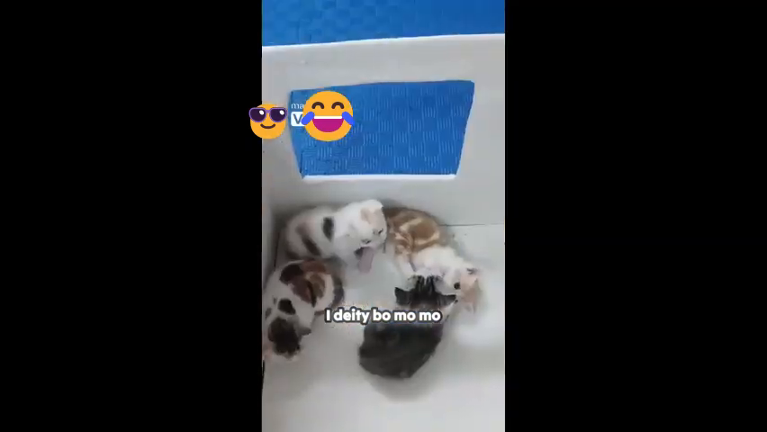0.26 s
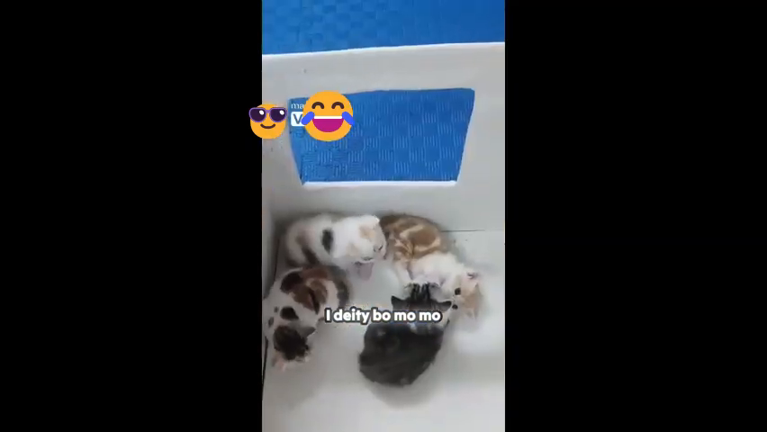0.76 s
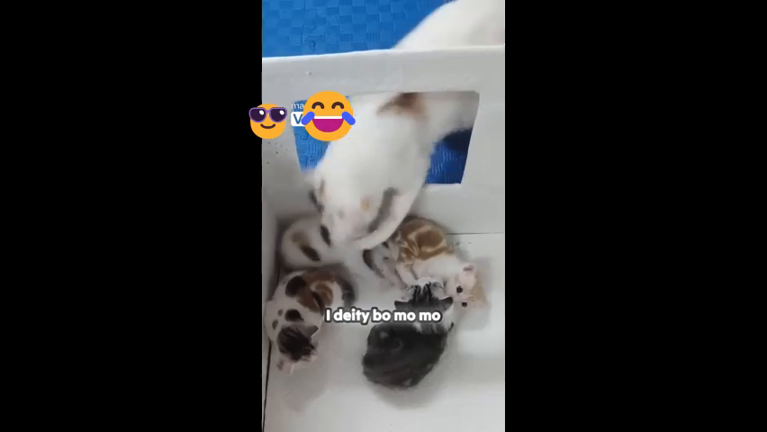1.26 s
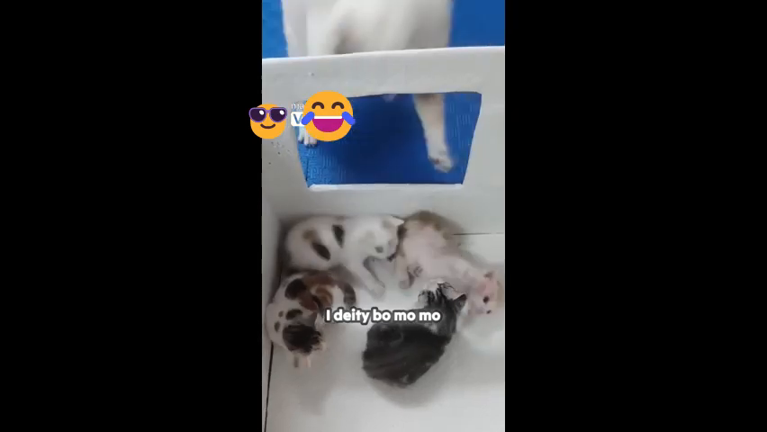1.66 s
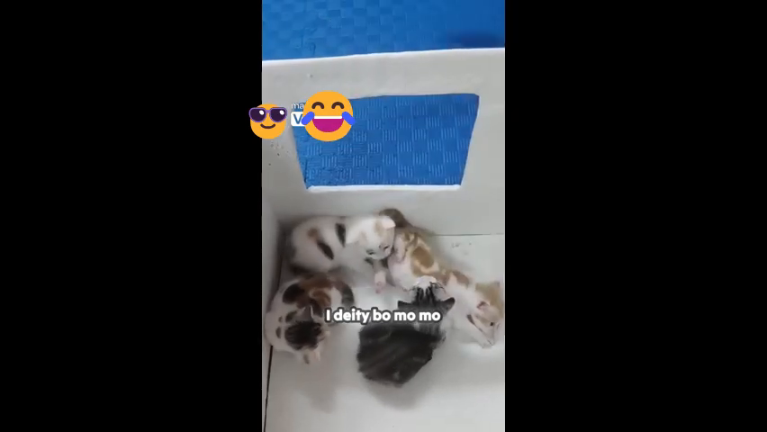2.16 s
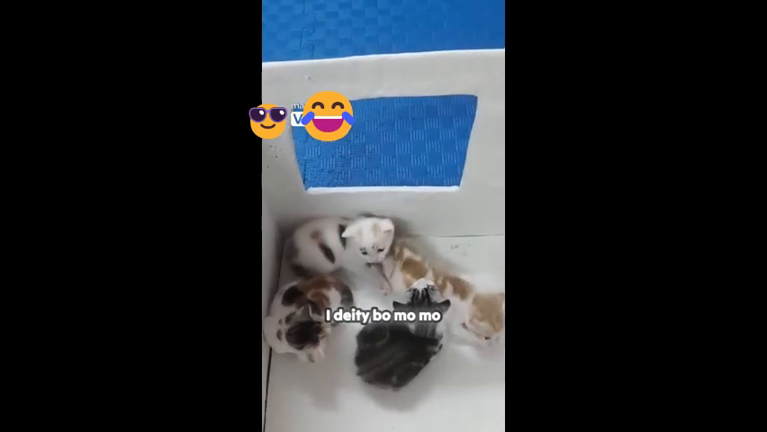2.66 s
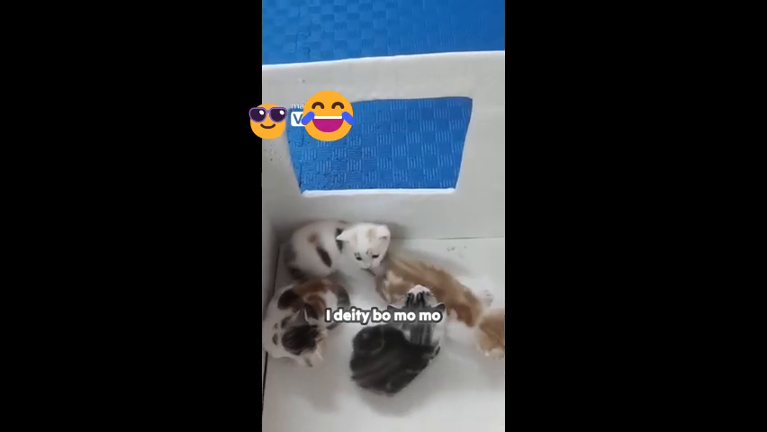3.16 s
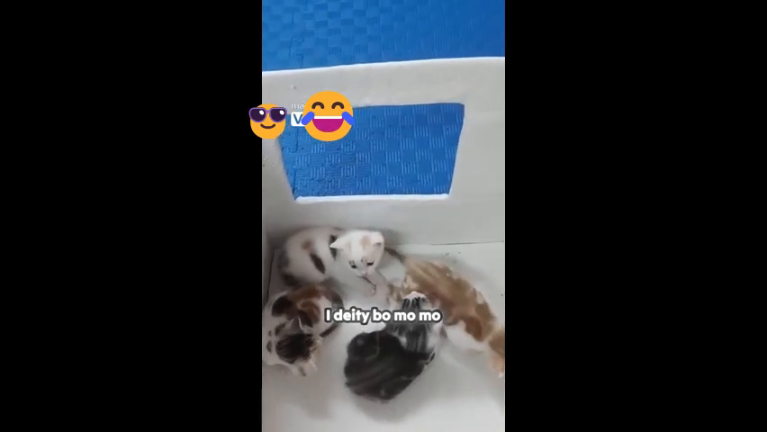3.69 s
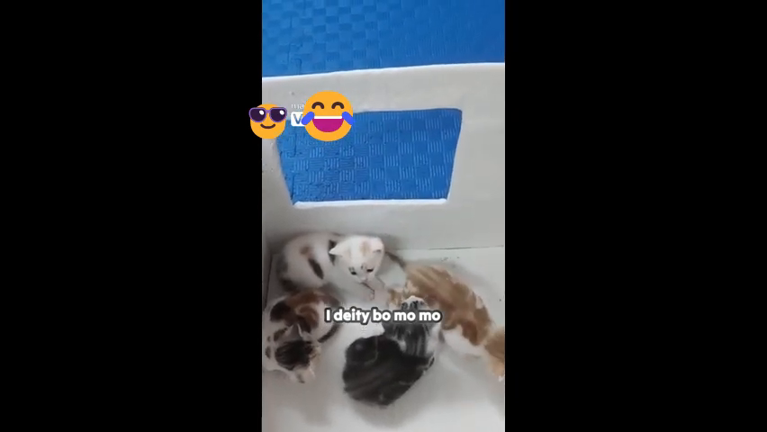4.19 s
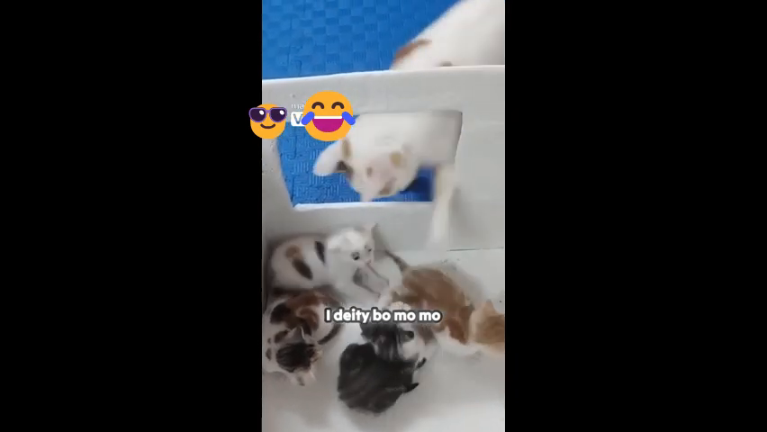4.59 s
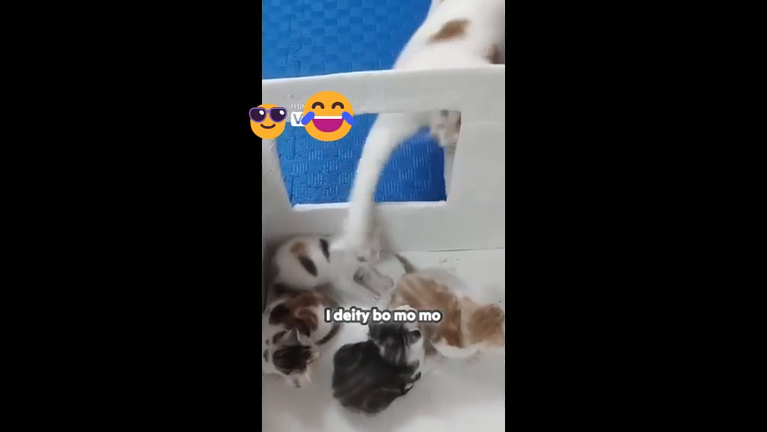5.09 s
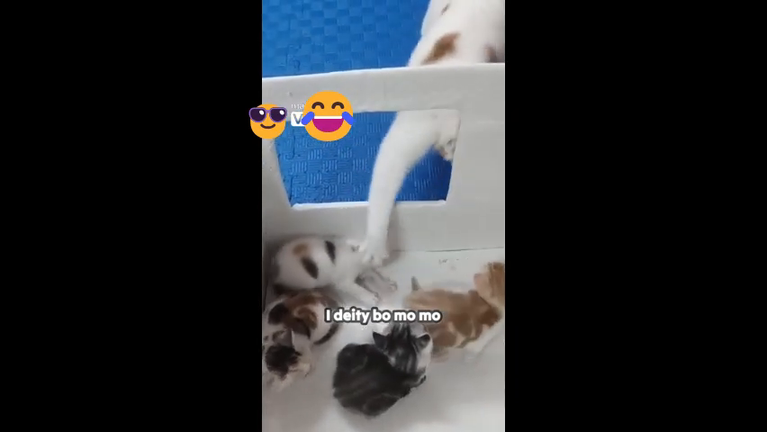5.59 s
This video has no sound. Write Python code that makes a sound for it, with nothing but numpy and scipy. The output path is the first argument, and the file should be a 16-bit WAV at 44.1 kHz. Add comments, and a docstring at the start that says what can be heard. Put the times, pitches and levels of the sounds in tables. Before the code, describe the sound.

Low rumble, a gently wavering indoor drone and thin steady hiss fade in over the first fifth of a second, with barely any fur stirring. At about 1.1 s a paw hits the hollow plastic box: short deep booms, a strong one near 1.2, grainy brushing, and small claw ticks with scratchy scuffs and a couple of thin snaps. Another cluster follows from 1.55 to 1.8, with louder fur strokes and a hollow knock, then softer rubs at 1.9 to 2.5. The middle is sparse: a faint tap near 3.05, a clearer plastic click at 3.3, a tiny tick at 4.0. From about 4.45 brushing and clicks resume, and strong round thumps come repeatedly from 4.6 to 5.7, with scrapes and faint snaps at 5.1, 5.3 and 5.5. The loudest booms are slightly squashed; a short room tail answers. Close stereo microphone.

```python
"""A cat paws at kittens through the hatch of a hollow plastic box, heard close up in stereo.
Low rumble, a room drone and steady hiss, all shaped noise, fade in with a faint stir of fur.
From about one second pushes boom in the wall's decaying modes while grainy noise strokes the plastic;
claws tick in short high modes with noisy scuffs, and thin noise snaps join a few of them.
The middle is sparser, then a run of strong booms fills the last part; a room tail answers."""
import sys
import numpy as np
from scipy import signal
from scipy.fft import rfft, irfft, next_fast_len
from scipy.io import wavfile
from scipy.ndimage import uniform_filter1d, map_coordinates

SR = 44100
rng = np.random.default_rng(int(sys.argv[2]) if len(sys.argv) > 2 else 0)


def to_wav(sig):
    """Store sig (one row per channel, or 1-D mono) as 16-bit WAV at the path in sys.argv[1].

    Samples outside -1..1 are clipped; the rate is SR.
    """
    pcm = np.clip(np.atleast_2d(sig), -1, 1) * 32767
    pcm = np.round(pcm).astype(np.int16)
    wavfile.write(sys.argv[1], SR, pcm.T)  # frames by channels


N = 257984


def amp(db):
    """Gain of a dB value."""
    return 10 ** (np.asarray(db) / 20)


def unit(x):
    """x at rms 1."""
    return x / np.sqrt(np.mean(x ** 2) + 1e-20)


def along(points, hz):
    """Read a curve of (Hz, value) points on a log frequency axis."""
    point_hz, value = np.transpose(points)
    return np.interp(np.log(hz + 1), np.log(point_hz + 1), value)


def curves(rows):
    """One value per sample for each column after the time."""
    point_s, *columns = np.transpose(rows)
    return [np.interp(np.arange(N) / SR, point_s, column) for column in columns]


def wobble(rate):
    """A smooth random curve, rate knots a second."""
    knots = rng.standard_normal(int(N * rate / SR) + 4)
    return map_coordinates(knots, [np.arange(N) * rate / SR])


def filtered(x, response):
    """x times a response of frequency."""
    size = next_fast_len(N + SR // 2)
    spectrum = rfft(x, size) * response(np.fft.rfftfreq(size, 1 / SR))
    return irfft(spectrum, size)[..., :N]


# Stereo width of the background noise: (pitch_hz, left_right_likeness [-1 to 1])
BACKGROUND_LIKENESS = [(60, 0.94), (120, 0.85), (240, 0.87), (480, 0.29), (950, -0.066), (1890, -0.12),
                       (3770, -0.22), (7520, 0.53), (10500, 1), (13000, 0.76), (15000, 0.64)]


def rush(spectrum, patchy_db, likeness=BACKGROUND_LIKENESS):
    """Stereo noise of rms 1, coloured by a spectrum, with patches of random gain in time and pitch."""
    grid = signal.stft(rng.standard_normal((2, N + 512)), nperseg=512)[2]
    patches = rng.standard_normal(grid.shape[1:])
    for axis in (0, 1):
        patches = uniform_filter1d(patches, size=6, axis=axis)
    pair = signal.istft(grid * amp(patchy_db * unit(patches)), nperseg=512)[1][:, :N]

    def mid_side_response(hz):
        # more side against mid makes left and right less alike
        angle = np.arccos(np.clip(along(likeness, hz), -.99, .99)) / 2
        return amp(along(spectrum, hz)) * [np.cos(angle), np.sin(angle)]

    mid, side = filtered(pair, mid_side_response)
    return unit(np.array([mid + side, mid - side]))


# Noise colours of the three beds: (pitch_hz, level_db [relative, per Hz])
RUMBLE_COLOUR = [(12, -46), (20, -6), (49, 4), (92, 3), (114, -6.5), (145, -6), (170, -14.5), (220, -79),
                 (370, -120)]
DRONE_COLOUR = [(88, -2), (150, -6), (233, -1), (352, -8.5), (370, -10.5), (409, -5.5), (446, -6.5),
                (475, -12), (574, -6.5), (626, -11), (971, -15.5), (1130, -14.5), (1860, -28),
                (3000, -40.5), (3900, -85), (6600, -120)]
HISS_COLOUR = [(1290, -21), (2200, -3.5), (2490, -0.5), (3530, -4), (6050, -9), (6520, -2), (8370, -15),
               (12900, -4), (14100, -7.5), (15500, -5), (16500, -60)]
RUMBLE_DB, DRONE_DB, HISS_DB = -40, -38, -57.5  # bed levels before level wobble and output gain


def background():
    """Lumpy rumble and a gently wavering room drone under a steady hiss, all coloured noise."""
    rumble_db = RUMBLE_DB + 0.4 * wobble(1.31) + 1.4 * wobble(31)
    rumble = amp(rumble_db) * rush(RUMBLE_COLOUR, patchy_db=2.1)
    drone_db = DRONE_DB + 0.91 * wobble(8.3)
    drone = amp(drone_db) * rush(DRONE_COLOUR, patchy_db=1.27)
    hiss = amp(HISS_DB) * rush(HISS_COLOUR, patchy_db=2.5)
    return rumble + drone + hiss


# Noise colours of bright hairs and duller paw pads: (pitch_hz, level_db [relative, per Hz])
HAIR_COLOUR = [(1290, -16), (2000, -15.5), (2430, -1.5), (2640, -3.5), (4380, -5), (5620, -3.5),
               (7960, -10.5), (10800, -8), (15500, -13), (16500, -60)]
PAD_COLOUR = [(300, -39), (600, -13.5), (1300, -5), (2200, -12.5), (4000, -60)]
# Stereo width of fur close by: (pitch_hz, left_right_likeness [-1 to 1])
FUR_LIKENESS = [(60, 0.84), (150, 0.93), (380, 0.42), (950, 0.05), (2380, 0.11), (5980, 0.1), (10500, 0.87),
                (13000, 0.4), (15000, 0.5)]
# The animals stirring between strokes: (time_s, hairs_db)
STIR = [(1.03, -77), (1.1, -65), (1.55, -51.5), (2, -52), (2.7, -54.5), (3.5, -60.5), (3.98, -64),
        (4.04, -55), (4.3, -58.5), (4.44, -68), (4.56, -46.5), (4.8, -50.5), (5.05, -53), (5.5, -56.5),
        (5.7, -51.5), (5.85, -54.5)]
# Strokes of the paw along the plastic: (start_s, hold_s, hairs_db, pads_db)
STROKES = [(1.076, 0.036, -48.5, -45.5), (1.168, 0.025, -49.5, -51), (1.343, 0.025, -53.5, -50),
           (1.572, 0.065, -42.5, -41), (1.737, 0.038, -44.5, -65), (1.941, 0.029, -47, -38),
           (2.125, 0.037, -54.5, -49), (2.323, .03, -49.5, -52), (2.482, 0.033, -52, -47.5),
           (4.456, 0.021, -46, -43.5), (4.528, 0.022, -42.5, -34), (4.57, 0.044, -53, -43),
           (4.802, 0.026, -48.5, -53), (4.91, 0.026, -44, -40), (5.116, 0.043, -47.5, -46),
           (5.271, 0.056, -48.5, -50), (5.595, 0.035, -52.5, -48.5)]
STIR_PADS_DB = -1  # pads over hairs while stirring
ATTACK_S, RELEASE_DB_PER_S = 0.0071, 209  # of every stroke


def fur():
    """Fur and pads brush the plastic: grainy noise in strokes over a faint stirring that swells and thins."""
    start_s, hold_s, hairs_db, pads_db = np.transpose(STROKES)[:, :, None]
    t = np.arange(N) / SR - start_s
    release_s = np.maximum(t - ATTACK_S - hold_s, 0)
    shape = np.clip(t / ATTACK_S, 0, 1) * amp(-RELEASE_DB_PER_S * release_s)
    stir = amp(curves(STIR)[0])
    grain = amp(1.1 * wobble(60) + 0.54 * wobble(400))
    hairs = unit(grain * rush(HAIR_COLOUR, patchy_db=2.5, likeness=FUR_LIKENESS))
    pads = unit(grain * rush(PAD_COLOUR, patchy_db=1.5, likeness=FUR_LIKENESS))

    def level(stroke_db, floor):
        # strokes and stirring add as powers
        stroke_power = ((amp(stroke_db) * shape) ** 2).sum(axis=0)
        return np.sqrt(stroke_power + floor ** 2)

    return level(hairs_db, stir) * hairs + level(pads_db, amp(STIR_PADS_DB) * stir) * pads


# Soft pushes on the wall: (start_s, lowest_modes_db, upper_modes_db,
# hardness_db_per_octave [tilt of the upper modes], damping [factor on ring time])
PUSHES = [(1.077, -13, -16, -6, 1.4), (1.109, -14, -21, 15, 0.5), (1.179, 3, -8.5, 2.5, 0.7),
          (1.346, -4, -18, 1.5, 0.87), (1.648, -11.5, -3, 2, 0.91), (1.674, -13, -20, 15, 0.83),
          (1.723, -32, -16, 2.5, 0.7), (1.761, -26, -26, 9.5, 2.1), (2.132, -24, -15.5, -9, 1),
          (3.047, -25.5, -32, 9, 1.34), (4.462, -27, -16.5, -1, 0.6), (4.496, -30, -17.5, 5.5, 0.72),
          (4.617, -2, -13.5, -10, 1.22), (4.729, 0.5, -16, -14, 0.53), (4.788, -4, -10.5, -8.5, 1),
          (5.116, -1.5, -9.5, -4, 1.26), (5.303, 0, -4.5, -12, 0.74), (5.34, -14.5, -20.5, -16, 2.8),
          (5.468, 1.5, -12, -11, 0.86), (5.688, -4, -17, -22, 0.9)]
# Modes of the hollow box wall: (pitch_hz, level_db, t60_s [before the damping factor])
WALL_MODES = [(85.25, -4, 0.33), (72.4, -16.5, 0.17), (98.2, -26, 0.086), (118, -5.5, 0.03),
              (142.4, -9.5, 0.25), (165.5, -2.5, 0.096), (197.2, -9, 0.19), (232.8, -6.5, 0.08),
              (291.5, -14, 0.12), (355, -14, 0.029), (446.6, -36, 0.4)]
UPPER_FROM_HZ, UPPER_DELAY_S = 110, 0.00387


def wall():
    """Each soft push rings the wall's modes; the paw's damping factor sets how long they ring."""
    out = np.zeros(N + SR)
    hz, level_db, t60_s = np.transpose(WALL_MODES)[:, :, None]
    upper = hz > UPPER_FROM_HZ
    # the upper modes wait until the pad is squeezed flat
    t = np.maximum(np.arange(SR // 2) / SR - upper * UPPER_DELAY_S, 0)
    rise_cycles = np.where(upper, .6, .9)
    rise = 1 - np.exp(-(t * hz / rise_cycles) ** 2)
    draws = rng.standard_normal((len(PUSHES), 2, len(WALL_MODES), 1))
    for (start_s, low_db, upper_db, tilt_db, damping), (size, bend) in zip(PUSHES, draws):
        decay_db = 60 * t / (t60_s * np.clip(damping, .2, 3))
        tilted_db = upper_db + tilt_db * np.log2(hz / 165) + 2.27 * size
        start_db = level_db + np.where(upper, tilted_db, low_db)
        swing = np.sin(2 * np.pi * hz * (1 + 0.0088 * bend) * t)
        boom = (rise * amp(start_db - decay_db) * swing).sum(axis=0)
        out[round(start_s * SR):][:t.shape[1]] += boom
    return out[:N]


# Claw ticks: (start_s, low_modes_db, middle_modes_db [over low], high_modes_db [over low],
# pan_db [left over right])
TICKS = [(1.089, -23.5, -9, -25, 6), (1.188, -27, -8, -10, -1.5), (1.214, -37.5, 1, -5, -5),
         (1.321, -32.5, -2.5, -22, 6), (1.586, -25.5, 6, -17, 2), (1.601, -22, -13, -13, 0),
         (1.654, -3, -42, -36, -3), (1.668, -29, -17, -30, 0), (1.68, -30, 2, -27, 2),
         (1.692, -26, -10, -30, -3), (1.737, -29, 5.5, 12, -2.5), (1.947, -38, 11, -4, 2),
         (2.133, -30.5, -0.5, -22, 5), (3.07, -21.5, -8.5, -29, 1), (3.258, -25.5, -28, -36, 3),
         (3.3036, -13.5, 1, -13, 2), (4.031, -36.5, -19, -14, 6), (4.464, -34, 6, -19, 3),
         (4.534, -38, 4, -13, 0), (4.543, -26.5, 9.5, -12, 4), (4.549, -19, -15, -12, 0),
         (5.126, -30, -12, -16, -6), (5.308, -34, 2.5, -7, -3), (5.338, -22, -32, -29, -1),
         (5.477, -32, -6.5, -13, -3)]
# Modes of the plastic under a claw: (pitch_hz, level_db)
SHELL_MODES = [(520, 4.5), (650, 7.5), (760, -10), (860, 5.5), (1030, 4), (1250, 4), (1430, 4),
               (1650, -2.5), (1900, 1.5), (2250, 1.5), (2500, -8), (2750, 3), (3150, 3.5), (3500, -15),
               (3900, -3), (4300, -9)]
TICK_T60_S = 0.012  # ring of a tick at 1 kHz
SCUFF_DB, SCUFF_GROWTH = -34, 0.46  # scuff after a tick that peaks at -20 dB; dB more per dB of tick


def claws():
    """A tick briefly rings plastic modes, some low and some bright; a like-coloured scuff follows."""
    out, t = np.zeros((2, N + SR)), np.arange(SR // 4) / SR
    hz, level_db = np.transpose(SHELL_MODES)[:, :, None]
    late_s = np.maximum(t - 0.00161 * (1 - 500 / hz), 0)  # high modes start at the peak of the contact
    contact = 1 - np.exp(-(late_s * hz / 1.465) ** 2)  # swing builds over about 1.5 cycles
    ring_s = TICK_T60_S * (1000 / hz) ** 0.43  # high modes die sooner
    scuff_shape = amp(-60 * t / 0.1) * (1 - np.exp(-t / 0.00091))
    draws = rng.standard_normal((len(TICKS), 2, len(SHELL_MODES), 1))
    noises = rng.standard_normal((len(TICKS), 2, len(t)))
    for (start_s, db, middle_db, high_db, pan_db), (size, bend), drag in zip(TICKS, draws, noises):
        colour_db = along([(650, 0), (1300, middle_db), (3000, high_db)], hz)
        start_db = db + level_db + colour_db + 1.1 * size
        swing = np.sin(2 * np.pi * hz * (1 + 0.026 * bend) * late_s)
        tick = (contact * amp(start_db - 60 * late_s / ring_s) * swing).sum(axis=0)
        # dragging noise rings through the tick, which gives it the same colour
        scuff = signal.fftconvolve(drag * scuff_shape, tick[None], axes=1)[:, :len(t)]
        peak_db = 20 * np.log10(np.abs(tick).max())
        scuff_db = SCUFF_DB + SCUFF_GROWTH * (peak_db + 20)
        scuff = amp(scuff_db) * scuff / np.linalg.norm(tick)
        pan = amp(pan_db * np.array([[.5], [-.5]]))
        out[:, round(start_s * SR):][:, :len(t)] += pan * (tick + scuff)
    return out[:, :N]


# Decay of the room's answer: (pitch_hz, t60_s)
ROOM_DECAY = [(300, 0.32), (1500, 0.47), (4000, 0.23), (12000, 0.39)]


def room(x):
    """A noise tail answers after a short gap, each frequency dying at its own speed."""
    hz, t, grid = signal.stft(rng.standard_normal((2, SR // 2)), SR, nperseg=256)
    decay = amp(-60 * t / along(ROOM_DECAY, hz)[:, None])
    tail = signal.istft(grid * decay, SR, nperseg=256)[1]
    delayed = np.pad(x, ((0, 0), (600, 0)))  # gap in samples
    return signal.fftconvolve(delayed, tail / np.linalg.norm(tail[0]), axes=1)[:, :N]


# Thin bright snaps as a claw slips free: (start_s, level_db [before the band filter])
SNAPS = [(1.19, -34), (1.215, -30), (5.126, -34), (5.308, -38), (5.477, -39)]
SNAP_T60_S, SNAP_LOW_HZ, SNAP_HIGH_HZ = 0.01, 1000, 7500


def snaps():
    """Each snap is a few milliseconds of band-passed noise with a steep decay."""
    out, t = np.zeros(N), np.arange(SR // 40) / SR
    noises = rng.standard_normal((len(SNAPS), len(t)))
    for (start_s, level_db), noise in zip(SNAPS, noises):
        out[round(start_s * SR):][:len(t)] += amp(level_db - 60 * t / SNAP_T60_S) * noise
    band = signal.butter(2, [SNAP_LOW_HZ, SNAP_HIGH_HZ], "band", fs=SR, output="sos")
    return signal.sosfilt(band, out)


def scene():
    """Mix the beds, fur, booms and ticks with the room's answer to booms and ticks."""
    ticks = claws() + snaps()
    boom = wall()
    direct = boom * amp([[.1], [-.1]]) + ticks  # booms a hair louder on the left
    answer = amp(-10.5) * room(ticks) + amp(-23.5) * room(np.array([boom, boom]))
    return direct + answer + fur() + background()


FADE_IN_S, GAIN_DB = 0.21, 6
BASS_CUT_HZ, TOP_HZ = 32, 15750


def record(dry):
    """A bass cut, gain, straight fade-in, soft clipping of the loudest booms and a band limit."""
    fade = np.clip(np.arange(N) / SR / FADE_IN_S, 0, 1)
    bass_cut = signal.butter(2, BASS_CUT_HZ, "high", fs=SR, output="sos")
    wet = signal.sosfilt(bass_cut, dry) * amp(GAIN_DB) * fade
    wet = wet / (1 + np.abs(wet / .99) ** 4) ** (1 / 4)
    return filtered(wet, lambda hz: hz < TOP_HZ)


dry = scene()
out = record(dry)
to_wav(out)
```